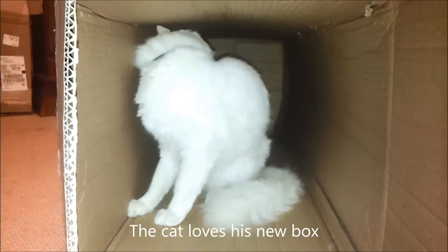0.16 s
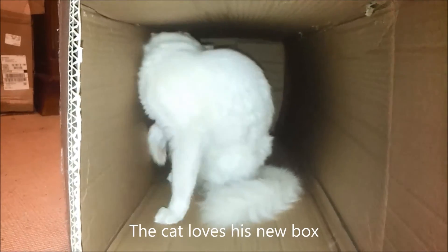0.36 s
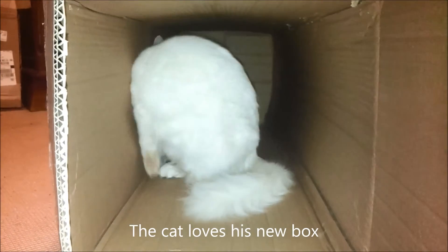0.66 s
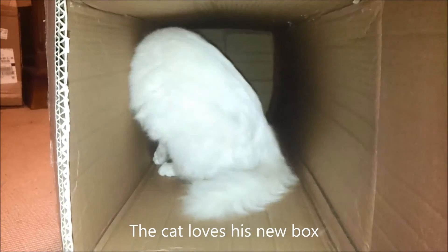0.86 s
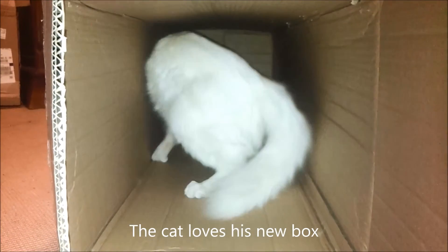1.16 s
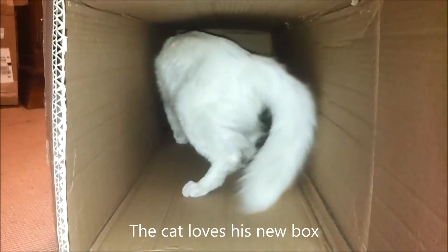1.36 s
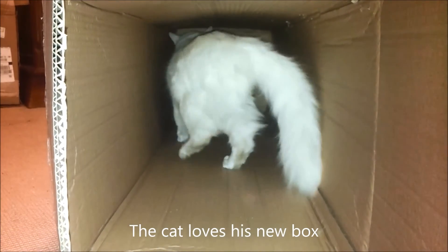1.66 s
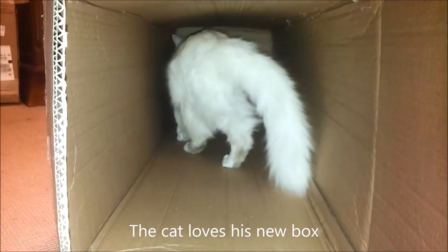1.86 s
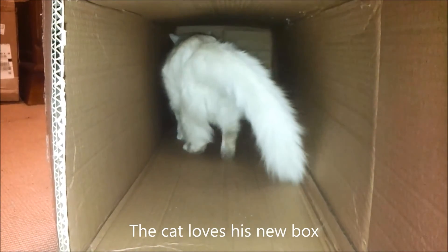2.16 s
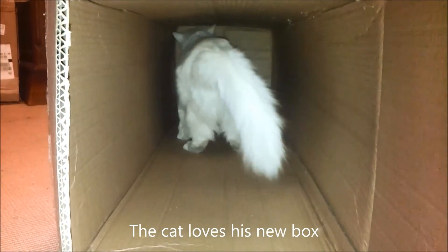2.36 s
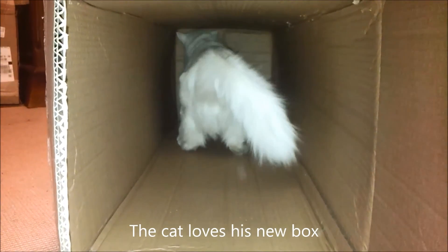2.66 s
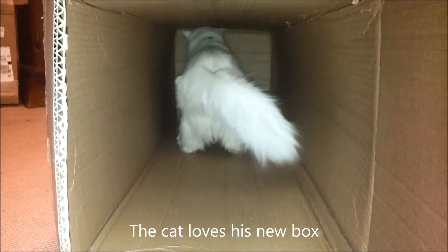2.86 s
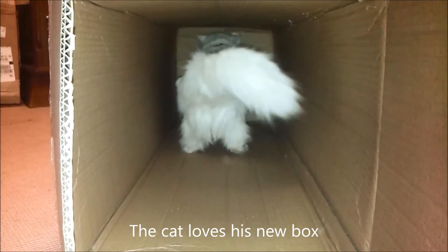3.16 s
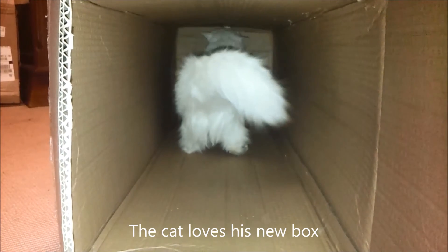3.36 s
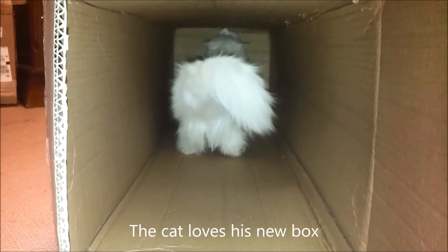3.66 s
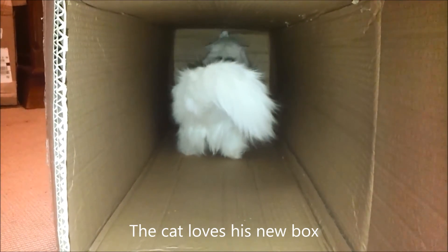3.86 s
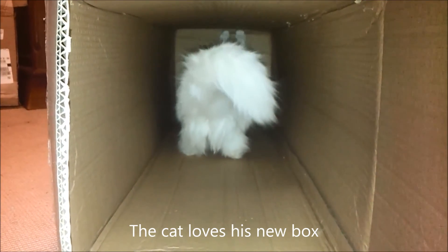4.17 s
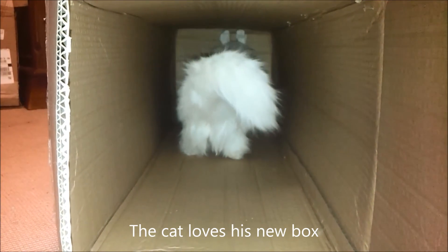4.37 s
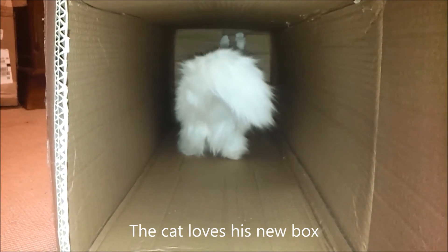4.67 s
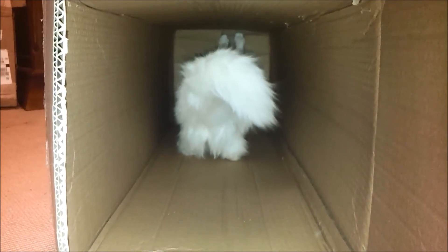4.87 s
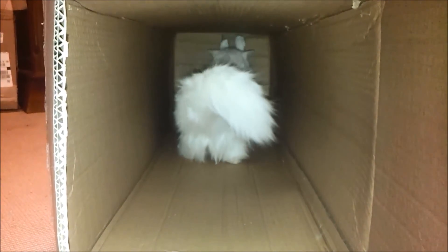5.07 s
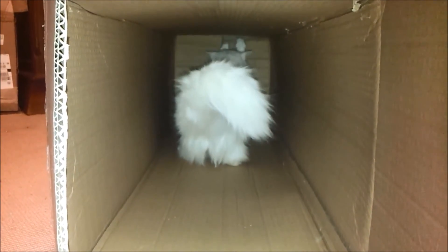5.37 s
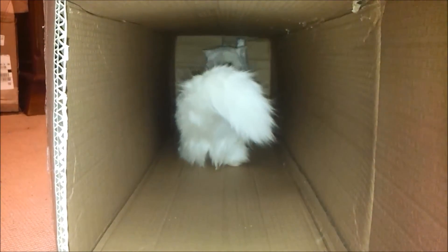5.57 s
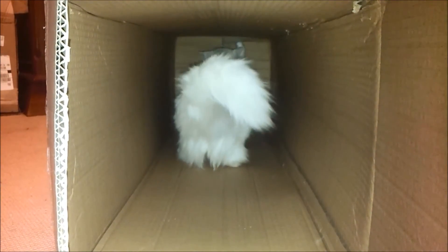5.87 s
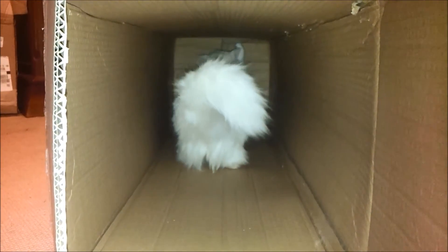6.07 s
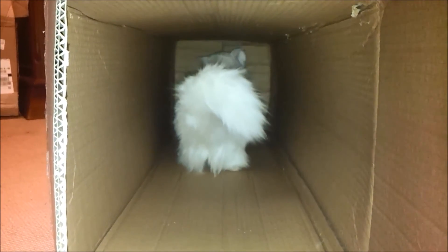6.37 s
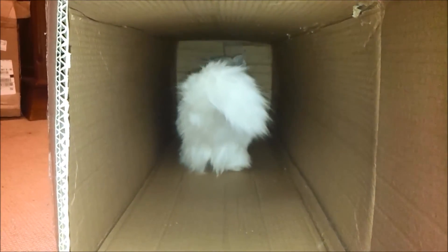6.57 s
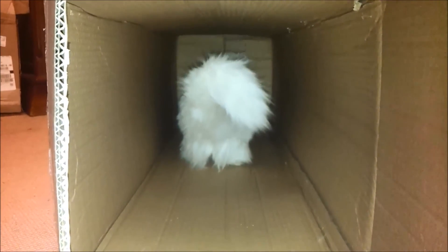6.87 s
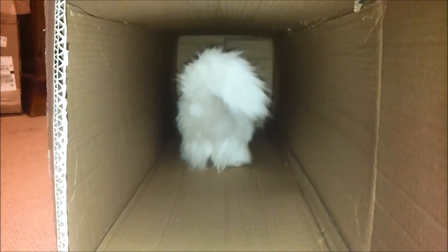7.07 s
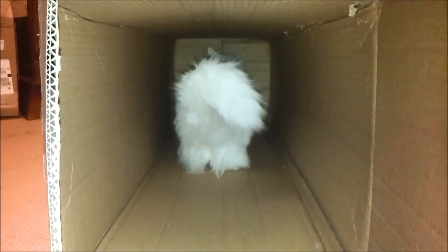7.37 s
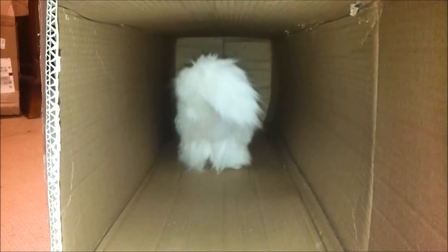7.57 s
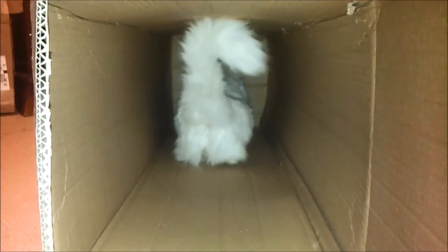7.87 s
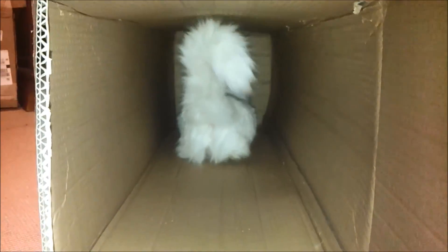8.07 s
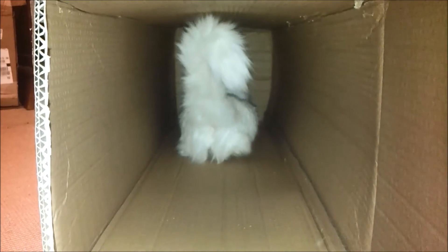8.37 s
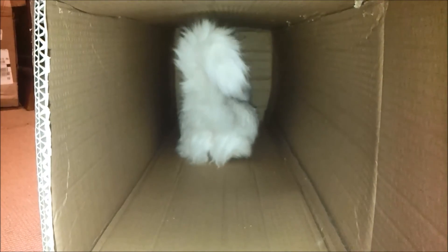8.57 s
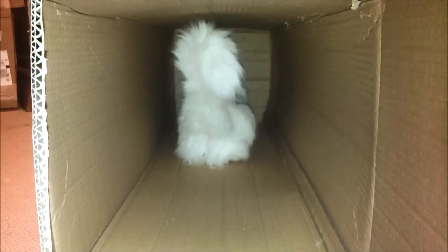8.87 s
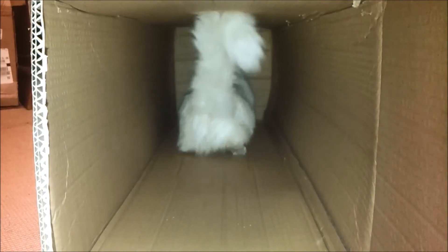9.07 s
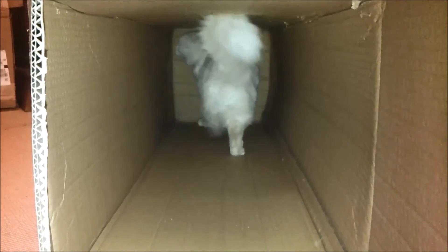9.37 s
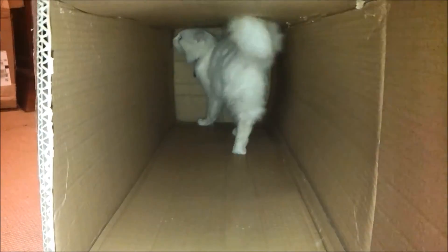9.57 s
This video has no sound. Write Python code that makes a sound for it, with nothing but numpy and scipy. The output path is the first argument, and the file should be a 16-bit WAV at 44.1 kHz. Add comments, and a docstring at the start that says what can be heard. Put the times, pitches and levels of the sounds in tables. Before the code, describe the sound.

A cat moves inside a long cardboard box, heard from its open mouth in a quiet room. From 0 to 1.5 s fur rustles broadly against the walls, with short claw rasps, crisp snaps and soft thuds. The rustle drops to light hiss; around 2.05 s a low, dull scuff rubs the floor, followed by busy dry scratching until about 3.2 s, where a sharp snap stands out. Strokes grow more spaced from 3.3 to 5 s, ending with a hard click at 5.0 s. Strong snaps come at 5.6 and 5.85 s, more scratching from 6.3 s, and a loud crack with a thump at 6.85 s. The fiercest scrabble, bright and clipped, runs 7.45 to 7.8 s. Then only faint ticks and small thuds remain, until a brief scrape near 9.4 s under slightly rising hiss. Low rumble and a very faint high whine persist; the board adds a short hollow ring.

```python
"""Inside a long cardboard box a cat shuffles about and claws at the far end, heard from the open mouth.
Claws rasp over the liner by stick-slip and snap free in short bursts of noise; paws thud and scuff on the
floor panel as decaying bending waves, and fur brushes the walls as soft friction noise.
Board resonances and wall echoes add a short hollow ring; beneath lie a faint rumble, a thin whine and
broad noise: fur rustle for the first 1.5 s, then hiss. The hardest peaks overload the microphone and clip."""
import sys
import numpy as np
from scipy import signal
from scipy.fft import rfft, irfft
from scipy.io import wavfile

SR = 44100
rng = np.random.default_rng(int(sys.argv[2]) if len(sys.argv) > 2 else 0)


def log_audio(samples):
    """Write samples as a 16-bit WAV file to the path given in sys.argv[1]."""
    # one column per channel
    frames = np.atleast_2d(samples).T
    # limit to full scale, then quantise
    limited = np.clip(frames, -1, 1)
    pcm = np.round(limited * 32767).astype(np.int16)
    wavfile.write(sys.argv[1], SR, pcm)


N = 429093
TIME = np.arange(N) / SR
TEN_MS = SR // 100  # in samples

# spectrum of claws on the liner: (frequency [Hz], gain [dB])
RASP_SPECTRUM = [(500, -43), (1400, -21), (2200, -9), (2850, 1.5), (3300, 7.5), (4000, 2.5), (5200, -10),
                 (6800, -22.5), (8700, -39), (12000, -55), (13900, -16), (16000, -51)]


def from_db(db):
    """Level law: decibels to amplitude gain."""
    return 10 ** (np.asarray(db) / 20)


def rms_one(x):
    """Normalisation: scale to unit rms."""
    return x / np.sqrt(np.mean(x ** 2) + 1e-20)


def at_level(x, db, size):
    """Energy scaling: give x the energy of `size` samples at this rms level."""
    return x * from_db(db) * np.sqrt(size / (np.sum(x ** 2) + 1e-20))


def add(out, start, x):
    """Superposition: mix x in from a time in seconds."""
    i = max(round(start * SR), 0)
    out[i:i + len(x)] += x[:max(N - i, 0)]


def drift(rate, size):
    """Random modulation: straight lines between normal random values, `rate` of them a second."""
    knots = np.arange(size) / SR * rate
    return np.interp(knots, np.arange(size), rng.standard_normal(size))


def colour(x, points, uneven_db=0, order=2048):
    """Minimum-phase filtering: a causal filter with this spectrum, plus the random peaks and dips of a spot."""
    hz = np.maximum(np.fft.rfftfreq(order, 1 / SR), 1)
    at, level = np.transpose(points)
    log_hz = np.log(hz)
    spot_db = np.interp(log_hz, np.log(np.geomspace(100, 16000, 48)), rng.standard_normal(48))
    gain = from_db(np.interp(log_hz, np.log(at), level) + uneven_db * spot_db)
    # folding the cepstrum onto positive times makes the response causal
    cepstrum = irfft(np.log(gain))
    fold = np.r_[1, np.full(order // 2 - 1, 2), np.zeros(order // 2)]
    response = irfft(np.exp(rfft(cepstrum * fold)))
    return signal.fftconvolve(x, response)[:len(x)]


def slips(size, per_s, spread_db, smooth):
    """Stick-slip: clicks of uneven size at random moments, over a share of smooth friction noise."""
    strength = from_db(spread_db * np.minimum(rng.exponential(1, size), 3))
    strength = strength * rng.choice([-1, 1], size)
    happens = rng.random(size) < per_s / SR
    return rms_one(strength * happens) + smooth * rng.standard_normal(size)


def claw_snaps(creak_db=-25, creak_s=0.0035, shiver_db=-16, shiver_s=0.011, edge_db=-17, uneven_db=2):
    """Sudden release of strain: the liner creaks, fibres tear in a short burst, then the spot shivers."""
    # a claw catches and snaps free: (time [s], burst length [s], level over 10 ms [dB],
    # pitch of the spot [Hz], sharpness of the claw [dB])
    snaps = [(0.1337, 0.0014, -26, 3760, 11), (0.287, 0.014, -25.5, 3330, 11.5),
             (0.701, 0.0027, -25, 3450, 19), (0.7878, 0.0017, -24.5, 3550, 21),
             (1.056, 0.0084, -21, 3620, 24), (1.634, 0.0018, -30, 3020, -6), (1.65, 0.0032, -28, 2540, -8),
             (1.702, 0.016, -21.5, 3370, -6), (2.0194, .003, -26, 3630, 0), (2.176, 0.0027, -27.5, 3620, 2),
             (2.188, 0.0039, -29, 3460, 20), (2.338, 0.0055, -24, 3600, -7),
             (2.405, .0016, -27.5, 3630, -16), (2.596, .0008, -30, 3800, -19),
             (2.97, 0.014, -24.5, 3420, -9), (3.06, .0016, -34, 3500, -10),
             (3.2031, 0.00087, -14.5, 3630, -6), (3.783, 0.0018, -34.5, 2740, -5),
             (3.809, 0.0042, -24, 3600, 8.5), (4.5235, .0014, -31, 3680, -3),
             (4.555, 0.0037, -31, 3700, -8), (4.605, 0.0012, -29.5, 3400, 17.5),
             (4.6405, 0.0018, -35.5, 3650, 7), (4.9066, .0011, -31, 3370, -5),
             (4.929, 0.00098, -35.5, 2400, 2), (4.9874, 0.0015, -32, 3640, 16),
             (4.9998, 0.0016, -16, 4360, -4), (5.6305, 0.0044, -17.5, 3650, 3),
             (5.643, .003, -18, 3670, 8.5), (5.8418, 0.0023, -11.5, 3480, 4.5),
             (5.965, 0.0048, -21.5, 3740, -11), (5.971, 0.0017, -17, 3480, -27),
             (6.119, 0.0023, -32.5, 4170, 7), (6.343, .0064, -18, 3530, 8), (6.491, 0.017, -24, 3280, -16),
             (6.524, 0.0081, -24, 3270, -20), (6.6846, 0.0014, -24, 3680, 2),
             (6.819, 0.0057, -22.5, 3330, -1), (6.85, 0.002, -7, 3820, 12), (6.8538, .0012, -7.5, 3460, -4),
             (6.865, 0.0022, -14, 3550, 11), (7.022, 0.0021, -32, 3700, 1),
             (7.4682, 0.0024, -4, 3100, 10.5), (7.529, .002, -22, 3470, 13), (7.548, .002, -21, 3760, 5),
             (7.633, 0.0096, -14.5, 3100, -3), (7.742, 0.0047, -23.5, 3930, 4),
             (8.401, 0.0045, -37.5, 2900, 5), (9.082, .001, -39.5, 3610, 41),
             (9.129, 0.0012, -35, 2750, 33), (9.3952, .01, -20.5, 3570, 10),
             (9.64, 0.0055, -32.5, 3340, 19)]
    # spectrum of a snap: (multiple of its pitch [ratio], gain [dB])
    snap_spectrum = [(.06, -23.5), (.23, -23.5), (.35, -45), (.5, -22), (.65, -10.5), (.85, 2.5),
                     (1.15, 1.5), (1.55, -16), (1.9, -18), (2.7, -35.5), (3.8, -36.5), (4.5, -28)]
    # bright edge of a sharp claw: (frequency [Hz], gain [dB])
    edge_spectrum = [(500, -13), (1700, 6.5), (3000, 5.5), (4500, 3), (7000, 2.5), (8800, -7),
                     (11000, -11.5), (15000, -11.5)]
    out, lead = np.zeros(N), .008  # creak before the snap [s]
    t = np.arange(SR // 25) / SR - lead
    creak = from_db(creak_db) * np.exp(-abs(t) / creak_s)
    shiver = from_db(shiver_db) * np.exp(-abs(t) / shiver_s)
    skirt = np.where(t < 0, creak, shiver)
    for s, length, db, hz, sharp_db in snaps:
        force = np.exp(-2 * (t / length) ** 2) + skirt
        # the square root of the magnitudes evens out the pitches
        tear = rfft(force * rng.choice([-1, 1], len(t)))
        tear = irfft(tear / np.sqrt(abs(tear) + 1e-9))
        tear = tear * np.where(t < 0, np.sqrt(force), 1)
        spot = rms_one(colour(tear, np.array(snap_spectrum) * [hz, 1], uneven_db))
        edge = from_db(edge_db + sharp_db) * rms_one(colour(tear, edge_spectrum, uneven_db))
        add(out, s - lead, at_level(spot + edge, db, TEN_MS))
    return out


def claw_grip(size, per_s, irregular=.7, slip_s=0.00084, spread_db=1.0, drag=0.57):
    """Stick-slip: a claw hops from fibre to fibre in short, unevenly spaced slips over a steady drag."""
    count = size // 20
    gaps = np.exp(irregular * rng.standard_normal(count)) * SR / per_s
    at = np.cumsum(gaps).astype(int)
    strength = from_db(spread_db * np.clip(rng.standard_normal(count), -2, 1))
    hops = np.zeros(size)
    hops[at[at < size]] = strength[at < size]
    return drag + signal.fftconvolve(hops, signal.windows.gaussian(TEN_MS, slip_s * SR), "same")


def wandering(force, shift_db=9, spots_per_s=45, uneven_db=8.0, count=5):
    """Local resonance: the claws pass from spot to spot, each answering with a colour of its own."""
    shares = np.array([from_db(shift_db * drift(spots_per_s, len(force))) for _ in range(count)])
    shares /= np.linalg.norm(shares, axis=0)  # the powers of the spots add up to one
    pushes = force * shares * rng.standard_normal(shares.shape)
    return sum(np.std(push) * rms_one(colour(push, RASP_SPECTRUM, uneven_db)) for push in pushes)


def strokes(swell=0.6, shear_db=7.0, brighten=0.49):
    """Friction under changing pressure: claws catch and slip, the panel rubs dully, fur swishes finely."""
    # a paw or the body drags over the board:
    # (start [s], length [s], claw rasp level [dB], panel rub level [dB])
    drags = [(0, 0.092, -46.5, -54), (0.129, 0.036, -35, -58), (0.187, 0.033, -41, -48),
             (0.244, 0.025, -41, -62), (0.323, 0.069, -60, -69), (0.555, .04, -40.5, -45.5),
             (0.762, .06, -34.5, -48.5), (0.907, 0.1, -37.5, -49.5), (1.034, 0.046, -38, -32.5),
             (1.202, 0.034, -49.5, -48), (1.285, 0.023, -64, -36), (1.378, 0.11, -57, -43),
             (1.631, 0.062, -39, -48), (1.682, 0.064, -34, -40.5), (2.014, .12, -30.5, -36),
             (2.17, .022, -33.5, -42), (2.281, 0.035, -34, -36), (2.313, .047, -30, -37.5),
             (2.379, 0.099, -39, -49.5), (2.548, 0.038, -43.5, -61), (2.593, 0.055, -32, -43.5),
             (2.84, 0.13, -31, -44), (2.954, 0.048, -33, -53), (3.053, .056, -38.5, -41.5),
             (3.349, .065, -35.5, -39), (3.43, 0.029, -42, -50), (3.48, .22, -44.5, -55),
             (3.818, .1, -33.5, -44), (4.082, 0.06, -37.5, -44), (4.159, 0.18, -47.5, -56),
             (4.462, .12, -38, -44), (4.981, 0.035, -34.5, -52), (5.194, 0.082, -44, -69),
             (5.476, .05, -42.5, -63), (5.846, 0.082, -36.5, -50.5), (5.943, 0.049, -35, -50),
             (6.315, 0.056, -39, -47), (6.403, .035, -41.5, -54), (6.465, 0.099, -34, -46.5),
             (6.622, 0.035, -41, -52), (6.803, 0.062, -28, -41), (6.849, 0.087, -49, -40),
             (7.068, 0.26, -38, -51), (7.461, 0.042, -21.5, -38), (7.504, .1, -20.5, -39.5),
             (7.597, .07, -18.5, -43), (7.655, 0.064, -30, -45), (7.718, .077, -28.5, -45.5),
             (7.8, 0.079, -32, -49), (7.866, .2, -45.5, -50.5), (8.397, 0.053, -57, -45),
             (9.295, 0.028, -42.5, -47.5), (9.381, 0.027, -29.5, -52)]
    # shearing fibres, rubbed panel and fur: (frequency [Hz], gain [dB])
    shear_spectrum = [(1000, -26.5), (2000, -3.5), (3200, -8), (4400, 5), (6000, -0.5), (7600, -9.5),
                      (9000, -33), (16000, -28)]
    panel_spectrum = [(50, -20.5), (130, 4.5), (300, 4), (600, 0), (950, -0.5), (1350, -4.5), (2000, -2),
                      (4000, -32.5), (9000, -48)]
    fur_spectrum = [(600, -18), (2000, 1), (4500, 9.5), (7000, 8.5), (8800, 6), (11000, 2), (14000, 5.5),
                    (16000, -11)]
    # pressure builds, is held, then lets go: (share of the stroke, pressure before the swell power)
    shares, pressures = np.array([0, 0.21, 0.41, 1]), [0.25, 0.86, 0.98, 0.048]
    # slips per second at a rasp level; more claws bite in a harder stroke
    hops_per_s, hops_at_db, hops_double_db = 280, -38, 15
    # the leg's fur brushes along with every stroke, below the rasp by this much
    fur_under_rasp_db = -18.5
    # while the cat turns round near the mouth, its whole flank brushes the wall
    turn_ends_s, turn_fur_db = 1.25, -40
    out = np.zeros(N)
    for start, length, rasp_db, panel_db in drags:
        size = max(int(length * SR), TEN_MS)
        t = np.arange(size + TEN_MS) / SR
        pressure = np.interp(t, length * shares, pressures) ** swell
        hop_rate = hops_per_s * 2 ** ((rasp_db - hops_at_db) / hops_double_db)
        grip = pressure * claw_grip(len(t), hop_rate)
        friction = np.sqrt(abs(grip) * pressure)
        # the harder the stroke, the more fibres shear off, and the brighter it hisses
        shear = colour(friction * rng.standard_normal(len(t)), shear_spectrum)
        rasp = rms_one(wandering(grip)) + from_db(shear_db + brighten * rasp_db) * rms_one(shear)
        rub = friction * slips(len(t), per_s=500, spread_db=3, smooth=0.91)
        panel = colour(rub, panel_spectrum, uneven_db=4.0)
        brush = pressure * slips(len(t), per_s=4600, spread_db=8.0, smooth=0.62)
        fur = colour(brush, fur_spectrum, uneven_db=4.5)
        fur_db = turn_fur_db if start < turn_ends_s else rasp_db + fur_under_rasp_db
        add(out, start, at_level(rasp, rasp_db, size))
        add(out, start, at_level(panel, panel_db, size))
        add(out, start, at_level(fur, fur_db, size))
    return out


def paw_thuds(spread=1.84, rise_s=.0011, flutter_db=-1, first=2.786, last=0.563, settle_s=0.00256,
              damping=4.3):
    """Dispersion of bending waves: highs arrive first, while the floor panel flutters and flexes."""
    # a paw lands, the panel buckles, or (2.03 to 2.08 s) one scuff rubs the panel:
    # (time [s], decay of the flutter's drive [s], level over 10 ms [dB], centre frequency [Hz])
    thuds = [(0.34, .023, -35.5, 197), (.93, 0.0026, -30, 286), (1.252, 0.0032, -34.5, 376),
             (1.056, 0.034, -40, 635), (1.632, .021, -28.5, 331), (2.03, .018, -28.5, 540),
             (2.048, .016, -22, 420), (2.058, 0.019, -24.5, 552), (2.08, 0.029, -22, 532),
             (2.316, 0.041, -35.5, 343), (3.203, 0.017, -27, 856), (3.34, 0.013, -31, 812),
             (3.807, 0.015, -27.5, 280), (3.815, .018, -31, 110), (3.87, 0.035, -28.5, 516),
             (4.088, 0.0059, -35.5, 740), (4.702, 0.0057, -45.5, 600), (5.631, 0.029, -32.5, 238),
             (5.842, 0.016, -29, 352), (6.13, 0.021, -33, 135), (6.342, 0.018, -30.5, 390),
             (6.624, 0.022, -29, 154), (6.856, 0.012, -19.5, 192), (7.467, 0.022, -17.5, 403),
             (7.482, 0.03, -20.5, 175), (7.527, .023, -30, 457), (7.604, .01, -23.5, 420),
             (7.64, 0.024, -17, 197), (7.755, 0.018, -36.5, 575), (7.887, 0.0088, -34.5, 242),
             (8.172, 0.0072, -46.5, 610), (8.408, 0.011, -41.5, 332), (8.436, .012, -41.5, 420),
             (9.127, 0.0047, -39, 470)]
    # the whole floor gives under the push; its level is against a thud of the reference pitch
    flex_hz, flex_db, flex_decay_s = 67.7, -15.5, 0.034
    flex_thud_hz, flex_db_per_octave = 200, -5.5  # higher thuds move the floor less
    out, t = np.zeros(N), np.arange(SR // 8) / SR
    flex = np.sin(2 * np.pi * flex_hz * t) * np.exp(-t / flex_decay_s)
    for s, decay, db, hz in thuds:
        swing = (1 - np.exp(-t / rise_s)) * np.exp(-t / decay)
        # the pitch glides from first to last, as multiples of the centre
        bend_hz = hz * (last + (first - last) * np.exp(-t / settle_s))
        bend = swing ** damping * np.sin(2 * np.pi * np.cumsum(bend_hz) / SR)
        panel = signal.butter(2, [hz / spread, hz * spread], "band", fs=SR, output="sos")
        flutter = signal.sosfilt(panel, swing * rng.standard_normal(len(t)))
        thud = rms_one(bend) + from_db(flutter_db) * rms_one(flutter)
        octaves = np.log2(hz / flex_thud_hz)
        add(out, s, at_level(thud, db, TEN_MS))
        add(out, s, at_level(flex, db + flex_db + flex_db_per_octave * octaves, TEN_MS))
    return out


def fidgets(clump_db=3, clumps_per_s=9):
    """Sparse stick-slip: faint stray ticks of claws resting on the board come in clumps."""
    # restless paws while the cat digs and again as it stands up:
    # (time [s], level of the ticks before clumping [dB])
    restlessness = [(0, -65), (1.5, -62), (2.2, -55), (3.5, -56), (4.8, -52.5), (6.2, -51.5), (7.3, -46.5),
                    (7.9, -53), (8.15, -63.5), (9, -62), (9.3, -54)]
    level = np.interp(TIME, *np.transpose(restlessness))
    busy = from_db(level + clump_db * np.clip(drift(clumps_per_s, N), -2, 1))
    ticks = slips(N, per_s=170, spread_db=5.0, smooth=0.23)
    return busy * rms_one(colour(ticks, RASP_SPECTRUM))


def box(x, t60=0.37, ring_db=-17, wall_hz=3500):
    """Resonance and reverberation: the board rings at a few pitches, and wall echoes die fast."""
    # narrow rings of the board: (frequency [Hz], bandwidth [Hz], gain [dB])
    modes = [(335, 18, -4), (385, 30, -28), (842, 63, -8), (3070, 70, -24), (4080, 830, -33),
             (6700, 440, -6.5)]
    board = x.copy()
    for hz, width, db in modes:
        board += from_db(db) * signal.lfilter(*signal.iirpeak(hz, hz / width, fs=SR), x)
    t = np.arange(SR // 2) / SR
    echoes = rng.standard_normal(len(t)) * from_db(-60 * t / t60) * (t > .002)
    dull_walls = signal.butter(1, wall_hz, fs=SR, output="sos")
    echoes = signal.sosfilt(dull_walls, at_level(echoes, ring_db, 1))
    return board + signal.fftconvolve(board, echoes)[:N]


def background(rumble_db=-48.5, whine_hz=9825, whine_db=-70):
    """Filtered noise and a pure tone: steady room rumble, early fur rustle and then hiss, a thin whine."""
    # hiss and, in the first 1.5 s, fur rustle over time: (time [s], level [dB])
    rustle_and_hiss_level = [(0, -44.5), (1.1, -41), (1.5, -45.5), (1.56, -53), (2.2, -51), (5.0, -50.5),
                             (6.6, -49), (7.2, -44.5), (7.7, -45.5), (8.1, -53), (8.7, -52), (9.4, -44.5),
                             (9.73, -46)]
    # spectrum shared by rustle and hiss, and that of the rumble: (frequency [Hz], gain [dB])
    rustle_and_hiss_spectrum = [(800, 0), (2000, 0), (3400, 5), (5000, 4), (7000, 2.5), (8200, 4),
                                (9700, 4), (11500, -1), (14000, -2.5), (16000, -6.5)]
    rumble_spectrum = [(25, -41), (60, -10), (125, -4.5), (150, -7.5), (234, -1.5), (292, -8.5),
                       (335, -16.5), (540, -11.5), (650, -13), (730, -8.5), (820, -16.5), (1100, -19.5),
                       (1730, -16), (2500, -27), (3300, -51.5)]
    rumble = rms_one(colour(rng.standard_normal(N), rumble_spectrum, order=8192))
    level = np.interp(TIME, *np.transpose(rustle_and_hiss_level))
    rustle_and_hiss = rms_one(colour(rng.standard_normal(N), rustle_and_hiss_spectrum))
    whine = rms_one(np.sin(2 * np.pi * whine_hz * TIME))
    return from_db(rumble_db) * rumble + from_db(level) * rustle_and_hiss + from_db(whine_db) * whine


def scene():
    """Superposition: the cat heard through the box, over the background."""
    cat = claw_snaps() + strokes() + paw_thuds() + fidgets()
    return (box(cat) + background())[None]


def record(dry, low_cut_hz=35, cutoff_hz=16100):
    """Overload and band limits: the hardest peaks clip flat; the deep bass and the top are cut."""
    bass_cut = signal.butter(3, low_cut_hz, "high", fs=SR, output="sos")
    top_cut = signal.ellip(10, .2, 70, cutoff_hz, fs=SR, output="sos")
    clipped = np.clip(dry, -1, 1)
    return signal.sosfilt(top_cut, signal.sosfilt(bass_cut, clipped))


dry = scene()
out = record(dry)
log_audio(out)
```